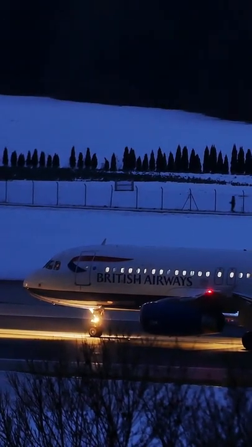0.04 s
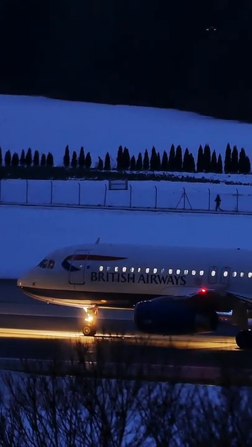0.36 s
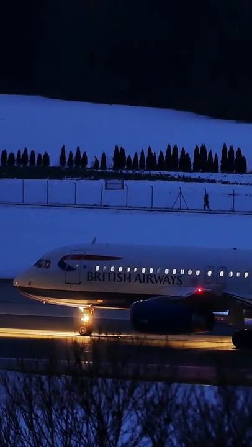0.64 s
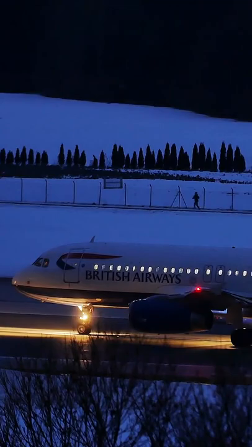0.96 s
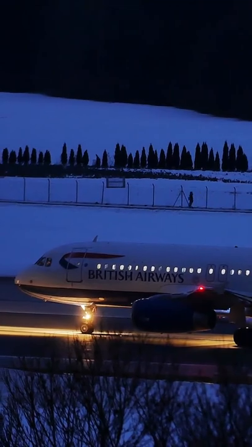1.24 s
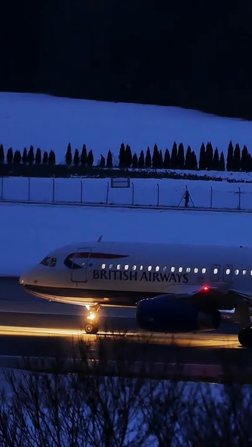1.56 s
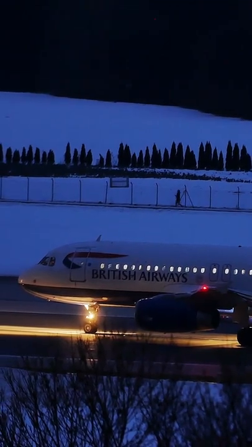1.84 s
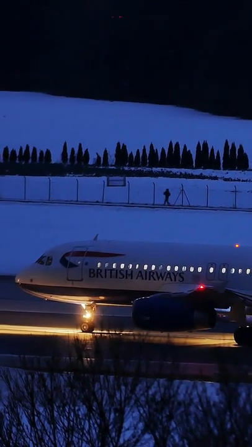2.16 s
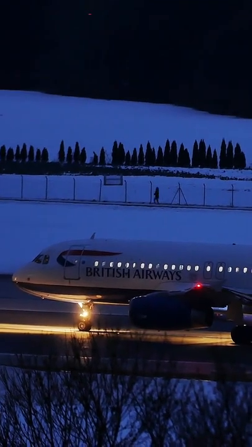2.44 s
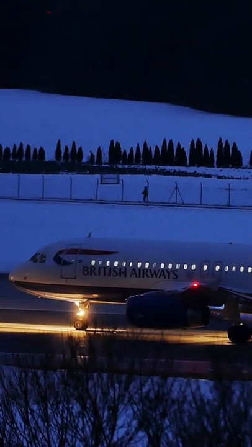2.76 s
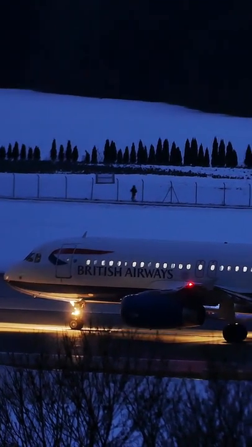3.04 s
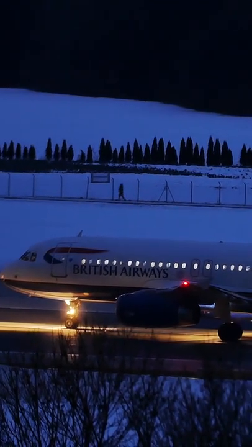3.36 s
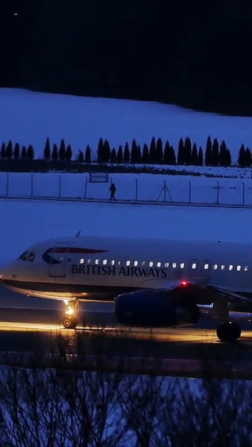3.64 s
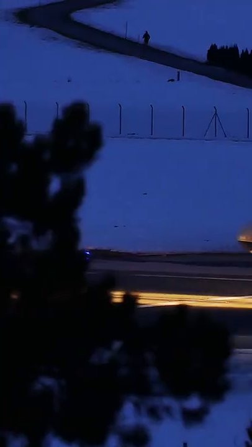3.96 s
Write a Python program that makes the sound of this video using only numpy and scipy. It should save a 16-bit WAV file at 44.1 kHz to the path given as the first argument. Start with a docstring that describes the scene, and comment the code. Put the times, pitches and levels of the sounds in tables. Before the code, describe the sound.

A distant jet airliner taxis with a dull, steady, slightly patchy roar. An engine hum dies away within the first second, while faint high fan whines swell in turn and creep up in pitch. At about 3.9 seconds the sound cuts abruptly, with a snap and a thump, to a much louder, deeper, close jet rumble with droning tones, which lasts only a moment until the end.

```python
"""A dull, steady exhaust roar comes from a jet airliner taxiing far off on a winter evening.
The roar is turbulent noise, made patchy by the air it crosses. An engine hum dies away within
the first second, while a cluster of fan whines creeps up in pitch as the fan gains speed.
Just before the end the sound cuts, with a snap and a thump, to a much louder, deeper rumble:
close jet noise with droning tones."""
import sys
import numpy as np
from scipy import signal
from scipy.fft import rfft, irfft
from scipy.io import wavfile
from scipy.ndimage import uniform_filter1d

SR = 44100
rng = np.random.default_rng(int(sys.argv[2]) if len(sys.argv) > 2 else 0)


def digitize_waveform(pressure):
    """Quantize a signal to 16-bit integers and store it at the path in sys.argv[1].

    Rows of a 2-D input are taken as channels; values are limited to [-1, 1].
    """
    field = np.atleast_2d(pressure).T
    bounded = np.clip(field, -1, 1)
    quanta = np.round(bounded * 32767).astype(np.int16)
    wavfile.write(sys.argv[1], SR, quanta)


N = 176400
CUT_S = 3.8896

# Spectral density of the distant roar: frequency_hz, relative_db
ROAR_SPECTRUM = [(20, -29), (45, -26), (75, -22.5), (110, -12.5), (150, -5.5), (235, -7), (430, -5.5),
                 (540, -2), (800, -1.5), (1050, -3.5), (1200, -7.5), (1580, -7.5), (1660, -11),
                 (1850, -11.5), (2050, -12), (2170, -14), (2300, -12.5), (2550, -16.5), (3100, -24),
                 (3800, -27), (5000, -38.5), (7000, -44.5), (8000, -53.5), (9000, -46.5), (10200, -47.5),
                 (11800, -52.5), (12600, -62), (16000, -90)]
# Its resonances and dips: centre_hz, width_hz, lift_db
ROAR_RESONANCES = [(156, 16, 4), (187, 35, 5), (238, 24, -6), (279, 28, 10), (372, 20, 7), (408, 20, -3),
                   (526, 34, 4), (600, 18, 4), (678, 20, 3.5), (748, 20, -3), (792, 36, 4.5), (860, 40, 2),
                   (952, 25, 3), (1120, 25, 3.5), (1506, 22, 3), (1612, 16, 4), (1755, 25, 2.5)]
# Its overall level: time_s, level_db
ROAR_ENVELOPE = [(0, -45), (.15, -45.5), (.8, -46), (1.2, -46.5), (2.1, -46.5), (2.55, -46.5), (3.2, -47),
                 (3.85, -48)]
# Its bass against the rest: time_s, lift_db
BASS_LIFT = [(0, -3.5), (.4, 2.5), (.62, -1), (.88, 3.5), (1.3, -2.5), (1.85, 0.5), (2.25, -3.5), (2.7, 0),
             (3.22, 0), (3.85, 1.5)]
# Its middle band against the rest: time_s, lift_db
MID_LIFT = [(0, 1.5), (.45, -1.5), (1.25, -1), (1.8, -0.5), (2.3, 0.5), (3.25, 2), (3.6, -1), (3.85, 0.5)]
# Its treble against the rest: time_s, lift_db
TREBLE_LIFT = [(0, -1.6), (.7, 0.71), (1.3, 0.53), (2.1, -0.9), (3.85, 1)]
# Its likeness at the two ears: frequency_hz, coherence_ratio
ROAR_COHERENCE = [(40, 0.22), (130, 0.91), (400, .85), (900, 0.76), (2500, 0.81), (5000, 0.67),
                  (10000, 0.93)]
# Its interaural balance: frequency_hz, left_minus_right_db
ROAR_PAN = [(60, -7), (86, -0.5), (120, 0.5), (180, 0.0), (260, 0.5), (370, -2), (530, -0.5), (760, 2.5),
            (1100, 4), (1580, 2.5), (2270, 2), (3270, 1.5)]
# Its interaural phase: frequency_hz, left_lead_rad
ROAR_LEAD = [(40, .1), (250, 0.093), (380, 0.5), (520, 0), (800, 0.46), (1050, 0.34), (1290, 0.0012),
             (1700, 0.35), (2500, .15), (3400, 0), (10000, 0)]
# Brief flares in the roar: centre_s, pitch_hz, half_length_s, peak_db
ROAR_FLARES = [(0.928, 287, 0.017, -43), (2.708, 784, .003, -39.5)]
# Partials of the hum: pitch_hz, level_db, fade_midpoint_s
HUM_TONES = [(373, -63.5, 0.61), (510, -65, 0.38), (594, -61, 0.54), (641, -52.5, 0.56), (739, -58, 0.6),
             (1118, -67, 0.68), (1288, -60.5, 0.7), (1925, -70, 0.88), (2570, -72, 0.77)]
# Fan tones: start_pitch_hz, steady_db, swells as (centre_s, half_length_s, peak_db)
FAN_TONES = [(1983, -70, [(.95, 0.18, -73), (2.15, 0.57, -66.5)]), (2030, -68.5, [(.55, .15, -70),
             (1.65, 0.28, -64), (3.65, 0.46, -63)]), (2061, -77, [(1.05, 0.23, -64), (1.65, 0.18, -62),
             (2.3, 0.55, -64.5)]), (2250, -78, [(0.1, 0.25, -65.5), (0.95, 0.35, -61), (1.42, .1, -63.5)]),
             (2300, -82, [(.65, 0.39, -72)])]

# Spectral density of the close rumble: frequency_hz, relative_db
RUMBLE_SPECTRUM = [(20, -35), (50, -36), (80, -17.5), (125, 1), (165, -2.5), (210, -1.5), (320, -10.5),
                   (400, -6), (480, -4.5), (620, -4.5), (780, -9.5), (1050, -4), (1300, -13), (1400, -14),
                   (1550, -8.5), (1850, -14), (2200, -18), (2500, -16.5), (2800, -21), (3700, -30.5),
                   (4600, -41.5), (6800, -54), (7300, -73), (9000, -94), (16000, -100)]
# Its resonances: centre_hz, width_hz, lift_db
RUMBLE_RESONANCES = [(276, 34, 8.5), (610, 50, 3), (1288, 43, 9), (1510, 45, 3), (1550, 45, 1.5),
                     (2076, 50, 7)]
# Its likeness at the two ears: frequency_hz, coherence_ratio
RUMBLE_COHERENCE = [(60, .99), (190, 0.96), (350, 0.78), (600, 0.94), (1200, 0.79), (2000, 0.96),
                    (3300, 0.96)]
# Its interaural balance: frequency_hz, left_minus_right_db
RUMBLE_PAN = [(60, -.6), (250, -1.2), (550, 1.5), (1100, 1.5), (2500, 0.24)]
# Its interaural phase: frequency_hz, left_lead_rad
RUMBLE_LEAD = [(60, 0), (700, 0.11), (3000, 0)]
# Its tones before the level sags: pitch_hz, steady_db, swells as (centre_s, half_length_s, peak_db)
DRONE_TONES = [(272.3, -30, [(3.94, 0.011, -24.5)]), (376.4, -36, [(3.966, 0.01, -25)]),
               (680, -39.5, [(3.895, .006, -27.5), (3.927, 0.0091, -23.5)]), (839, -36.5, []),
               (1055, -59, [(3.993, 0.0081, -28)]), (1600, -37.5, []), (1742, -40.5, [])]


def amp(db):
    """Amplitude grows tenfold for every 20 decibels."""
    return 10 ** (np.asarray(db) / 20)


def unit_rms(x):
    """Normalisation to unit mean power."""
    return x / np.sqrt(np.mean(abs(x) ** 2) + 1e-20)


def at_frequency(table, hz):
    """Interpolation on a logarithmic frequency axis."""
    knots_hz, values = np.transpose(table)
    return np.interp(np.log(hz + 1), np.log(knots_hz + 1), values)


def at_time(table, t):
    """Linear interpolation in time."""
    return np.interp(t, *np.transpose(table))


def drift(rate_hz):
    """Low-pass filtering turns white noise into a slow wander of unit rms."""
    hz = np.fft.rfftfreq(N, 1 / SR)
    return unit_rms(irfft(rfft(rng.standard_normal(N)) / (1 + (hz / rate_hz) ** 2), N))


def swelling(t, steady_db, swells):
    """Powers add: the gain of a steady tone with Gaussian swells."""
    swell_power = sum((amp(db) * np.exp(-((t - centre) / half) ** 2 / 2)) ** 2
                      for centre, half, db in swells)
    return np.sqrt(amp(steady_db) ** 2 + swell_power)


def engine_tone(hz, flutter, flutter_hz, pan_db):
    """Moving air modulates a tone's amplitude and phase, partly alike at both ears."""
    def wander():
        return flutter * (drift(flutter_hz) + 1j * drift(flutter_hz))

    carrier = np.exp(2j * np.pi * (np.cumsum(hz * np.ones(N)) / SR + rng.random()))
    shared = 1 + wander() / np.sqrt(2)
    ears = np.array([shared + wander() / 2 for _ in range(2)])
    return unit_rms((ears * carrier).real) * amp([[pan_db / 2], [-pan_db / 2]])


def jet_noise(spectrum, resonances, coherence, pan, lead):
    """Turbulence radiates broadband noise, coloured by resonances and partly coherent between the ears."""
    hz = np.fft.rfftfreq(N, 1 / SR)
    resonance_db = sum(lift / (1 + (2 * (hz - centre) / width) ** 2)
                       for centre, width, lift in resonances)
    colour = amp(at_frequency(spectrum, hz) + resonance_db)
    left, independent = rfft(rng.standard_normal((2, N)))
    likeness = np.clip(at_frequency(coherence, hz), -1, 1)
    right = likeness * left + np.sqrt(1 - likeness ** 2) * independent
    right *= np.exp(-1j * at_frequency(lead, hz))
    lean = amp(at_frequency(pan, hz) / 2)
    return unit_rms(irfft(np.array([left * lean, right / lean]) * colour, N))


def distant_roar(t):
    """Exhaust noise fades in patches as it crosses the air; three broad bands swell separately."""
    noise = jet_noise(ROAR_SPECTRUM, ROAR_RESONANCES, ROAR_COHERENCE, ROAR_PAN, ROAR_LEAD)
    hz, times, spectra = signal.stft(noise, SR, nperseg=1024, noverlap=768)
    patch_db, patch_width_hz, patch_s = 0.95, 300, .035
    patches = rng.standard_normal(spectra.shape)
    patches = uniform_filter1d(patches, round(patch_width_hz / hz[1]), axis=0)
    patches = unit_rms(uniform_filter1d(patches, round(patch_s / times[1]), axis=1))
    bass_hz, mid_hz, mid_width_hz, treble_hz = 368, 920, 140, 1400
    bass_db = at_time(BASS_LIFT, times) * np.exp(-(hz[:, None] / bass_hz) ** 2)
    mid_db = at_time(MID_LIFT, times) * np.exp(-((hz[:, None] - mid_hz) / mid_width_hz) ** 2)
    treble_db = at_time(TREBLE_LIFT, times) * (1 - np.exp(-(hz[:, None] / treble_hz) ** 2))
    spectra *= amp(patch_db * patches + bass_db + mid_db + treble_db)
    roar = signal.istft(spectra, SR, nperseg=1024, noverlap=768)[1][:, :N]
    level_db = at_time(ROAR_ENVELOPE, t) + 0.02 + 0.07 * drift(rate_hz=16)
    return unit_rms(roar) * amp(level_db)


def flares(t):
    """A Gaussian tone burst fills one narrow band, heard as a brief flare in the roar."""
    return sum(amp(db) * np.exp(-((t - centre) / half) ** 2 / 2)
               * np.sin(2 * np.pi * (hz * t + rng.random()))
               for centre, hz, half, db in ROAR_FLARES)


def engine_hum(t):
    """Tones of steady pitch superpose into a hum that fades within the first second."""
    fade_s = .06
    return sum(amp(db) * (1 - np.tanh((t - midpoint) / fade_s)) / 2
               * engine_tone(hz, flutter=0.18, flutter_hz=4.8, pan_db=3.5)
               for hz, db, midpoint in HUM_TONES)


def fan_whine(t):
    """Pitch follows fan speed, so the tones rise together; they swell in turn as the aircraft rolls by."""
    spool_rise, spool_time_constant_s = .032, 4.8
    speed = 1 + spool_rise * (1 - np.exp(-t / spool_time_constant_s))
    return sum(swelling(t, db, swells) * engine_tone(hz * speed, flutter=0.25, flutter_hz=13, pan_db=2.5)
               for hz, db, swells in FAN_TONES)


def thump_and_snap(t):
    """A heavily damped oscillation is heard as a thump, a far shorter pulse as a broadband snap."""
    thump_hz, rise_s, thump_decay_s, snap_decay_s = 464, .00025, .0014, .0001
    envelope = np.exp(-t / thump_decay_s) * (1 - np.exp(-t / rise_s))
    thump = amp(-8) * np.sin(2 * np.pi * thump_hz * t) * envelope
    snap = -amp(-22.5) * np.exp(-t / snap_decay_s)
    return thump + snap


def close_rumble(t):
    """Deep jet noise and droning tones superpose, starting abruptly and sagging slightly in level."""
    noise = jet_noise(RUMBLE_SPECTRUM, RUMBLE_RESONANCES, RUMBLE_COHERENCE, RUMBLE_PAN, RUMBLE_LEAD)
    rumble = amp(-21) * unit_rms(noise[:, :len(t)])
    for hz, db, swells in DRONE_TONES:
        drone = engine_tone(hz, flutter=0.35, flutter_hz=25, pan_db=0.5)[:, :len(t)]
        rumble += swelling(CUT_S + t, db, swells) * unit_rms(drone)
    sag_db_per_s, attack_s, release_s = 11, .0005, .002
    gate = np.minimum(t / attack_s, 1) * np.minimum(t[::-1] / release_s, 1)
    return rumble * amp(-sag_db_per_s * t) * gate


def scene():
    """The taxiing airliner's sources add linearly, until a hard cut to the close rumble."""
    t = np.arange(N) / SR
    cut = round(CUT_S * SR)
    since_cut = t[:N - cut]
    taxiing = distant_roar(t) + flares(t) + fan_whine(t) + engine_hum(t)
    close = close_rumble(since_cut) + thump_and_snap(since_cut)
    return np.concatenate([taxiing[:, :cut], close], axis=1)


def record(dry):
    """A linear-phase low-pass filter limits the bandwidth."""
    cutoff_hz = 12600
    lowpass = signal.firwin(255, cutoff_hz, window=("kaiser", 8), fs=SR)
    return signal.oaconvolve(dry, lowpass[None], "same")


dry = scene()
out = record(dry)
digitize_waveform(out)
```